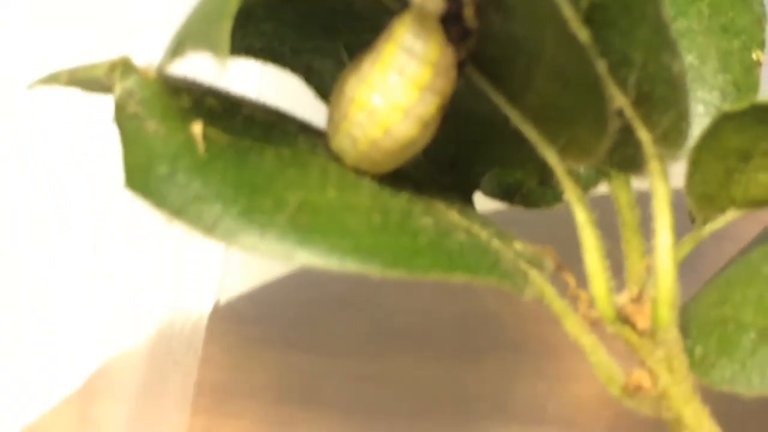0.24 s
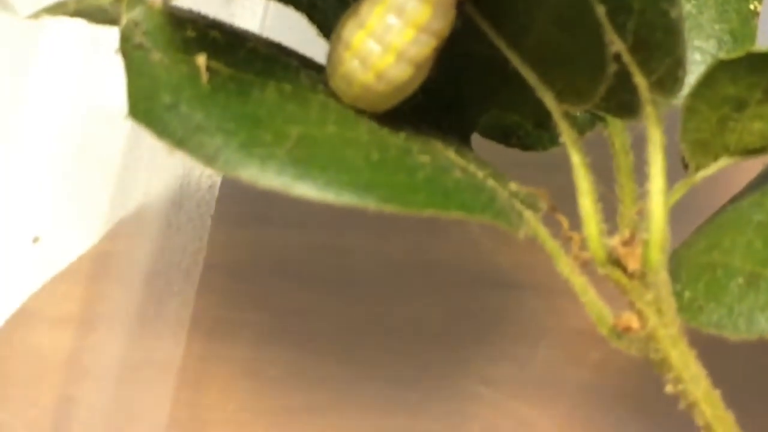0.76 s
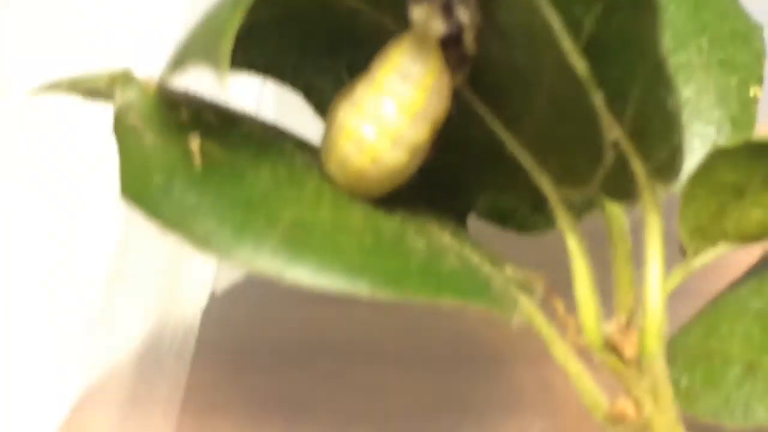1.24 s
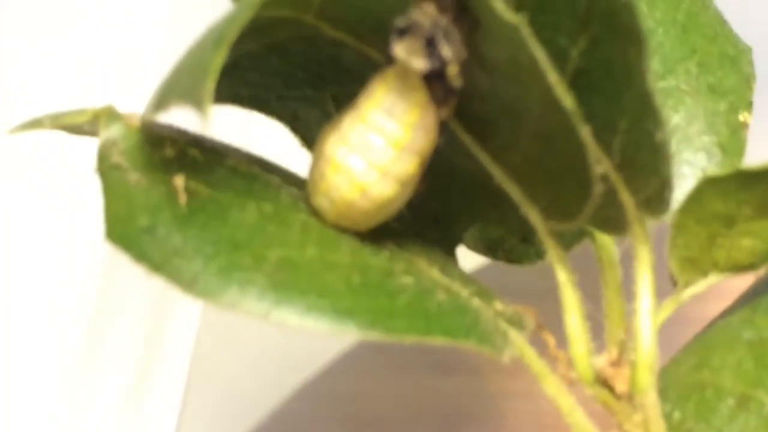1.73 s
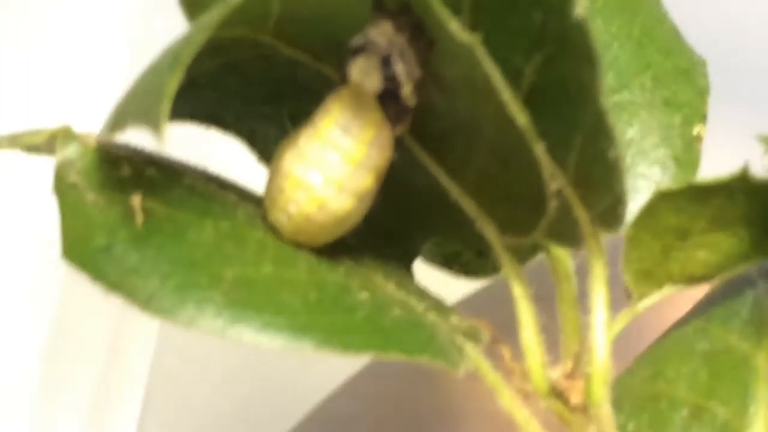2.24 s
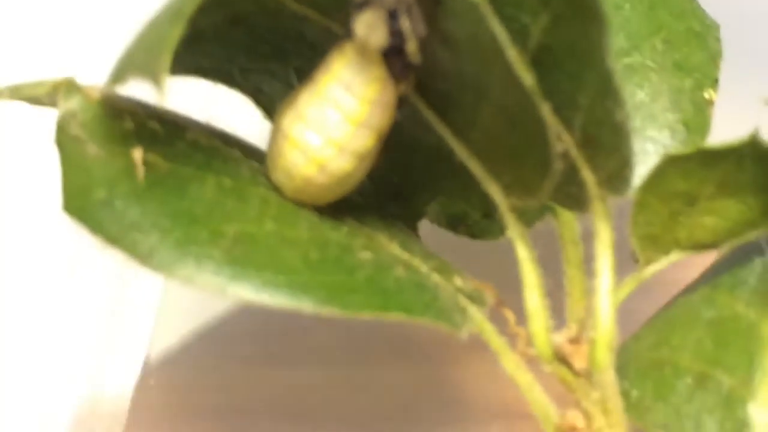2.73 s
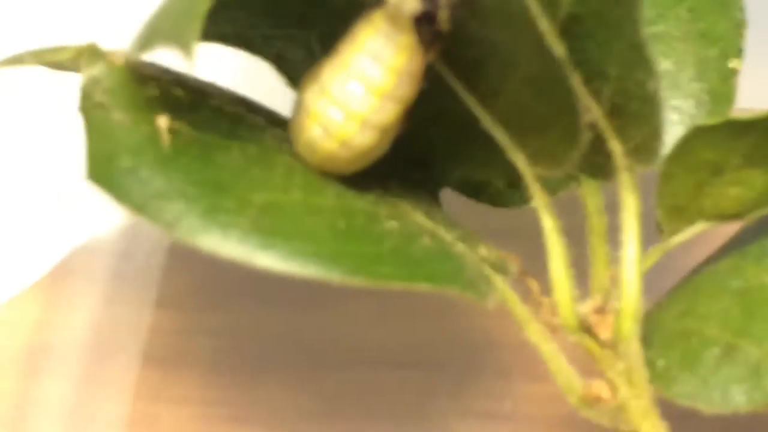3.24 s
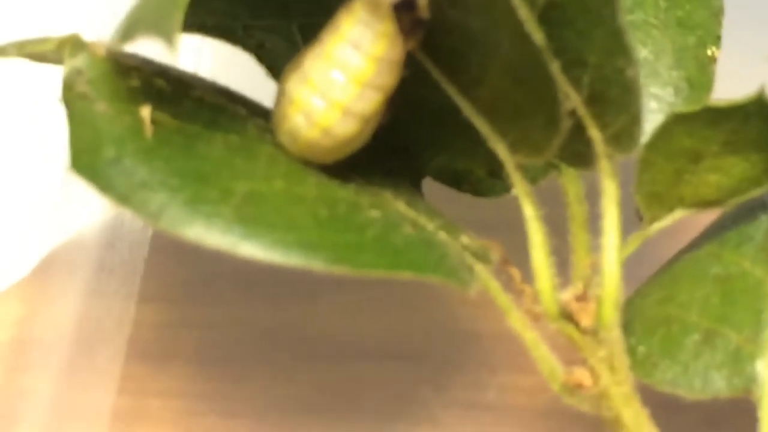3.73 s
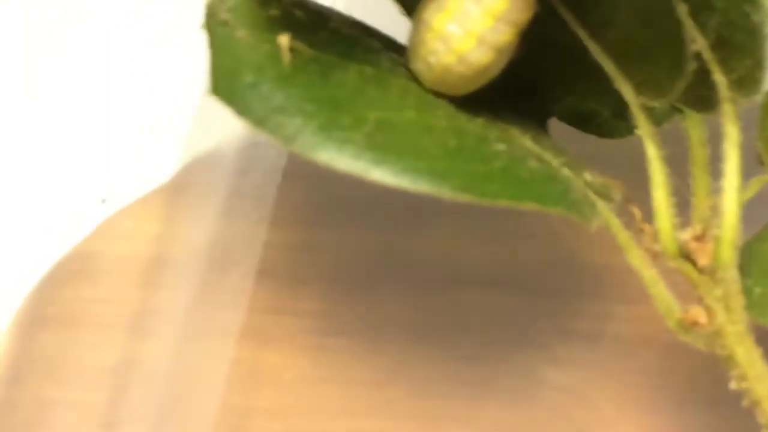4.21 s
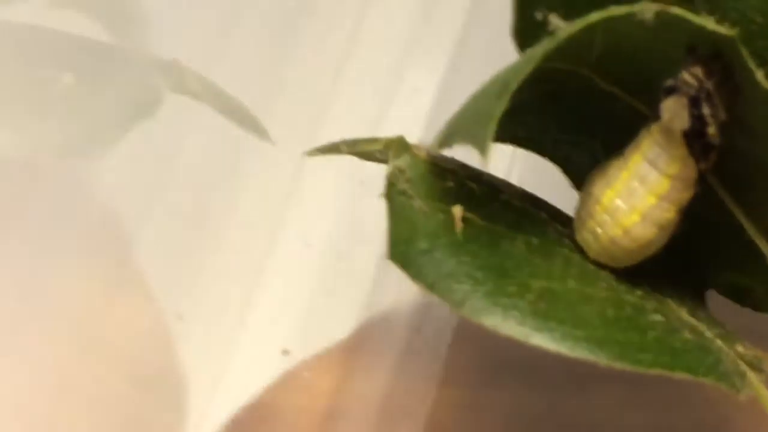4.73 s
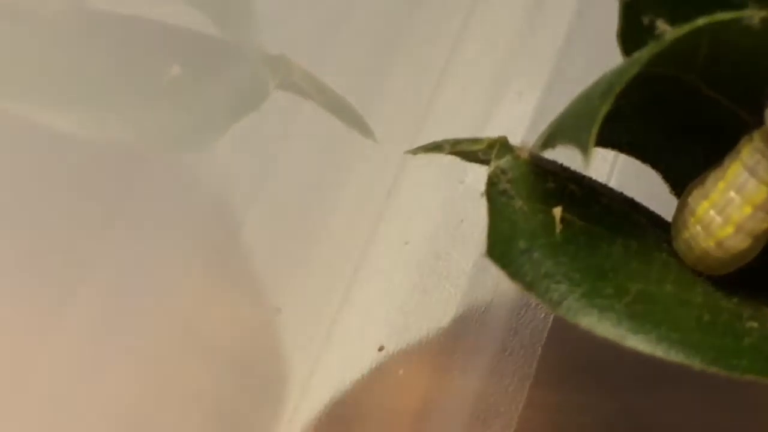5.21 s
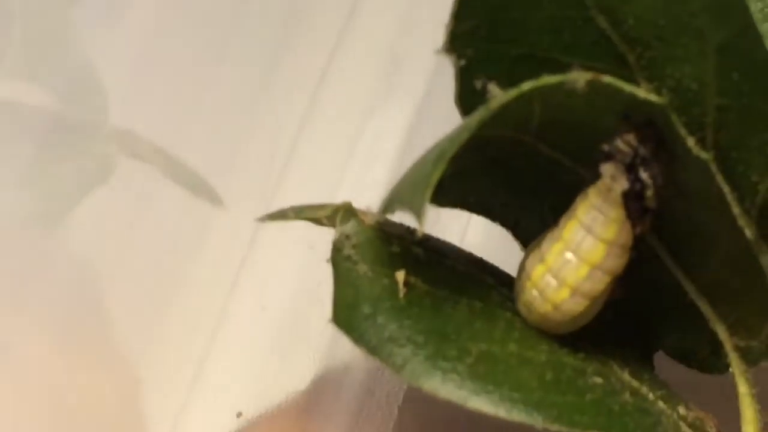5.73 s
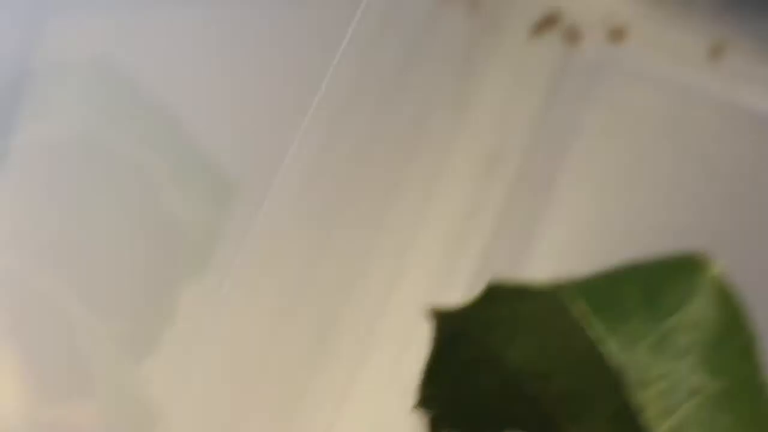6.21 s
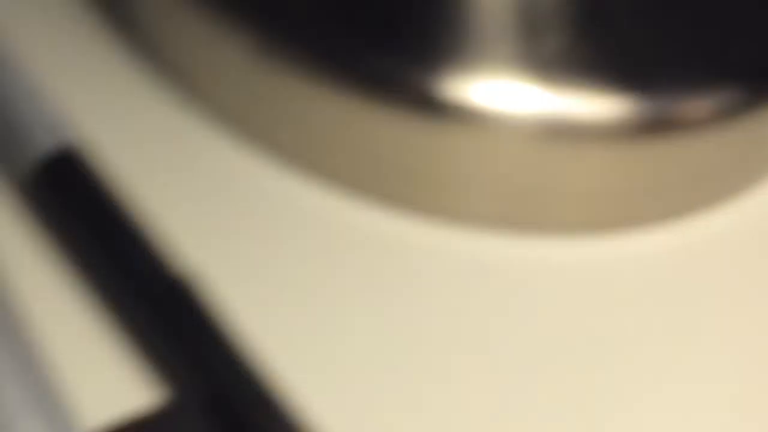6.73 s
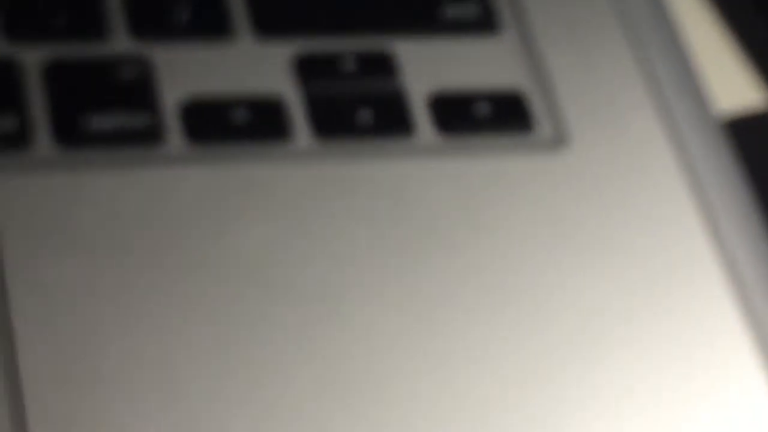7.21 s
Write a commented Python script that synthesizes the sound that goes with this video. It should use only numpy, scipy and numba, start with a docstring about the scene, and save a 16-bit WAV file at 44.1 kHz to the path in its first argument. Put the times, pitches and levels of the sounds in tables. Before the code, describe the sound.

Very close to a phone microphone in a quiet room, fingers rub the case with dull rumbling strokes and soft thuds. Heavier shuddering bumps come early, then one overwhelming cracking knock at about three seconds. Afterwards only faint scuffs remain, with a crisp knock near six seconds and a few tiny clicks at the end.

```python
"""Fingers shifting on a handheld phone

Close to the microphone, in a quiet room with a faintly buzzing lamp, skin rubs over the case in strokes,
shudders by stick-slip where it grips, and bumps it. Random friction and short pushes excite
the resonances of one small body; short bands of noise add scuffs, squeaks, cracks and airy hiss.
Light taps and ticks are damped modes, room air is shaped noise, the lamp a resonance on mains harmonics.
The phone's gain control ducks after the loudest blows."""
import sys
import numpy as np
from scipy import signal
from scipy.fft import rfft, irfft
from scipy.io import wavfile
from scipy.ndimage import uniform_filter1d
from numba import njit

SR = 44100
rng = np.random.default_rng(int(sys.argv[2]) if len(sys.argv) > 2 else 0)


def waveform_to_disk(signal):
    """Save audio, clipped to [-1, 1], as 16-bit WAV at the path in sys.argv[1]."""
    frames = np.transpose(np.atleast_2d(signal))
    scaled = np.clip(frames, -1, 1) * 32767
    samples = np.round(scaled).astype(np.int16)
    wavfile.write(sys.argv[1], SR, samples)


N = 328866
TIME = np.arange(N) / SR  # seconds

# Spectrum of still room air and microphone hiss, relative shape: frequency_hz, density_db
ROOM_SPECTRUM = [(18, -31.5), (30, -0.5), (97, -1.5), (524, -14.5), (1110, -14), (1870, -21.5), (3980, -25),
                 (4650, -25.5), (5300, -24.5), (15000, -32.5)]
# Lamp buzz over time: time_s, centre_hz, level_db
LAMP_DRIFT = [(0, 4650, -82.5), (2, 4574, -80), (4.4, 4520, -81), (4.7, 4300, -80.5), (5.9, 4193, -81),
              (6.25, 4310, -87), (6.44, 5060, -84.5), (6.55, 4470, -83.5), (6.8, 4460, -93)]
# Light taps of a hollow plastic thing: start_s, peak_db
TAPS = [(3.85, -39.5), (6.765, -49), (6.835, -43.5)]
# Modes of the tapped thing: frequency_hz, relative_level_db, t60_s
TAP_MODES = [(824, 8.5, 0.022), (971, 0, .012), (1323, 8, 0.017), (1787, -20, 0.0099), (3377, -18.5, .008)]
# Tiny hard ticks: start_s, peak_db
TICKS = [(7.089, -41), (7.346, -63.5)]
# Modes of the ticks: frequency_hz, relative_level_db, t60_s
TICK_MODES = [(5000, -2, 0.014), (5526, -5, 0.01), (5960, 1, 0.01), (9600, -5.5, 0.012)]
# Short bands of noise (scuffs, squeaks, the bright crack of a knock, airy hiss, a faint low bump):
# middle_s, length_s, centre_hz, width_hz, level_db
NOISE_BURSTS = [(0.23, 0.13, 2100, 110, -68), (2.981, 0.018, 11500, 7000, -44),
                (5.882, 0.004, 8800, 11000, -40.5), (5.368, 0.017, 3350, 2100, -52),
                (5.44, 0.028, 3500, 1300, -62.5), (6.114, 0.0078, 3370, 2030, -43.5),
                (6.109, 0.016, 8900, 9400, -57), (6.231, 0.0099, 614, 180, -42.5),
                (6.262, 0.0071, 550, 200, -41), (6.496, 0.033, 1780, 350, -64.5),
                (5.19, .05, 14000, 2500, -77), (7.299, 0.041, 277, 70.1, -67.5),
                (7.33, 0.02, 11600, 4600, -69.5)]
# Bumps on the case: start_s, knock_peak_db, knock_lowpass_hz, thud_peak_db, thud_lowpass_hz
BUMPS = [ (.335, -54, 400, -28.5, 150), (.371, -35, 1100, -37, 198), (.560, -37, 800, -30.5, 200),
         (0.672, -40, 910, -32.5, 200), (.740, -39, 900, -43, 200), (1.121, -38.5, 400, -41, 200),
         (1.182, -22.5, 700, -16, 200), (1.384, -35, 1200, -48, 200), (1.415, -28, 400, -27, 200),
         (1.853, -31, 400, -25.5, 250), (1.883, -24.5, 504, -34, 250), (1.909, -20, 503, -33, 250),
         (2.967, -2.5, 3000, 1, 85), (2.9736, -8.5, 2487, -3, 170), (2.98, -12.5, 4000, -15, 200),
         (2.9881, -16, 7984, -10.5, 170), (3.0203, -19, 700, -18, 250), (3.035, -26, 400, -16.5, 250),
         (3.644, -58.5, 406, -44.5, 100.5), (4.416, -47, 502, -45.5, 250), (5.267, -44, 700, -36, 80),
         (5.376, -30.5, 3000, -39, 200), (5.453, -54, 600, -32.5, 40), (5.512, -44, 696, -58, 200),
         (5.657, -38, 2500, -35.5, 30), (5.879, -15.5, 2460, -21.5, 30), (6.116, -41, 700, -28.5, 30),
         (6.513, -38, 250, -29, 100)]
# Broad slope of the case as the microphone hears it: frequency_hz, gain_db
CASE_SLOPE = [(25, -49), (45, -10.5), (80, 5.5), (170, 0.5), (300, -5.5), (600, -5), (950, -16.5),
              (1500, -21.5), (2700, -27.5), (3500, -30.5), (6000, -41), (9000, -49), (15000, -63.5)]
# Resonances of the case: frequency_hz, width_hz, lift_db
CASE_MODES = [(131.4, 74, 8.5), (207.2, 50, 8.5), (266.5, 30, 0), (341, 83, 7), (395.7, 110, -5.5),
              (506.7, 80, 7), (695.6, 110, 7), (810, 45, 2), (1210, 24, 3.5), (1300, 35, 4.5),
              (1428.5, 110, 15.5), (1661, 84, 6.5), (1872, 18, 5), (2091, 120, 8), (2200, 35, 6.5),
              (2397, 49, 7), (2626, 33, 8.5), (2815, 120, 9), (3560, 86, 4), (4199, 200, 2.5),
              (4630, 340, 5), (6125, 410, 7), (8600, 700, 0)]
# Stick-slip shudders of a gripping finger: full_grip_s, hold_s, slip_rate_hz, level_db
SHUDDERS = [(0.828, .022, 128, -24.5), (1.857, 0.12, 126.9, -15.5), (1.897, 0.03, 128, -10.5),
            (2.493, 0.037, 180, -37.5), (3.055, .02, 109.9, -27.5), (6.02, .008, 125, -38),
            (6.14, .03, 114.9, -44)]
# Finger strokes: full_contact_s, hold_s, release_s, rubbing_db, brightness_db (surface beside rubbing),
# rumble_db (pressed case), hiss_db (skin at the port)
STROKES = [ (0.136, 0.053, 0.021, -57, -10.5, -46, -80), (0.198, 0.13, 0.037, -63.5, 1.5, -55, -77),
           (0.382, 0.054, 0.032, -42, -9.5, -31, -80), (0.502, 0.23, 0.09, -52, -8, -38, -78.5),
           (0.81, 0.1, 0.033, -44, -10.5, -30.5, -78), (1.022, 0.054, 0.025, -55.5, -20, -44.5, -90),
           (1.144, .035, .02, -46.5, -17, -28.5, -84), (1.192, 0.023, 0.03, -28.5, -4.5, -26.5, -67),
           (1.328, .025, .02, -62, 6, -66, -71.5), (1.403, 0.016, 0.05, -39, -1.5, -32.5, -68),
           (1.598, 0.2, 0.045, -53, -5, -43.5, -85), (1.811, .08, .02, -43.5, -10, -33, -76.5),
           (1.923, 0.011, 0.01, -26, -8, -19.5, -78), (1.958, 0.018, 0.014, -36, -12, -28, -81),
           (2.284, 0.057, 0.041, -51, -4.5, -53.5, -77), (2.464, 0.094, 0.037, -41, -4.5, -40.5, -90),
           (2.594, 0.043, 0.072, -44.5, -4.5, -47, -77), (2.756, 0.047, 0.038, -36, -7, -41.5, -67),
           (2.896, 0.027, .02, -39, -11.5, -46, -76), (2.966, 0.025, 0.011, -19.5, -10.5, -25.5, -59),
           (3.01, 0.049, 0.01, -34, -15, -27, -73), (3.083, 0.022, 0.024, -59, 3.5, -56, -88),
           (3.187, 0.017, 0.01, -56, 0, -52.5, -98), (3.284, 0.047, 0.02, -59, 4, -47, -76),
           (3.482, 0.031, .015, -67.5, -4.5, -63, -85.5), (3.725, 0.042, 0.016, -65.5, 2.5, -72, -78.5),
           (3.976, 0.022, 0.018, -64.5, -4, -68, -86), (4.098, 0.062, 0.021, -68, -5.5, -58, -82),
           (4.16, 0.11, 0.019, -62, -3.5, -64.5, -82), (4.423, 0.032, 0.019, -51.5, -5.5, -51.5, -69.5),
           (4.476, 0.035, 0.028, -57, 5.5, -67, -63), (4.721, 0.008, 0.015, -57.5, -7.5, -51, -76.5),
           (4.796, 0.065, .02, -64, -11.5, -61.5, -88), (4.947, .05, 0.024, -60, -3, -67, -79.5),
           (5.01, 0.065, 0.071, -55, -4.5, -46, -71), (5.133, .045, 0.077, -57.5, -1.5, -60, -66.5),
           (5.307, .03, 0.017, -52.5, -5.5, -52, -73), (5.358, 0.027, 0.044, -45.5, -11.5, -50, -66),
           (5.43, .018, 0.017, -46.5, -4, -53, -77), (5.635, 0.028, 0.024, -81, -2, -53, -86.5),
           (6.022, 0.01, 0.018, -59, -4, -43.5, -82), (6.067, 0.063, .02, -58.5, -4.5, -62, -88),
           (6.126, 0.059, 0.013, -62.5, -5, -46.5, -86), (6.198, 0.048, 0.025, -53, 0.5, -62, -74),
           (6.506, 0.013, 0.032, -57, -10, -46.5, -86.5)]

ROOM_DB = -69  # rms
BUZZ_HZ = 120
TOP_HZ = 15300  # upper edge of the phone's band

# Friction: envelope times in seconds; levels of the resting hand in dB, held until it relaxes
ATTACK_S = .022
REST_RUB_DB, REST_BRIGHT_DB, REST_RUMBLE_DB, REST_HISS_DB = -69.5, -4, -63, -85.5
RELAX_S, RELAX_FADE_S, REST_WANDER_DB = 6.32, 0.075, 2.5
SHUDDER_ATTACK_S, SHUDDER_RELEASE_S = .016, .013

# Bumps: scrape and chatter levels are beside the push, times are exponential decays
SCRAPE_DB, SCRAPE_S, SCRAPE_HIGHPASS_HZ = 5.5, .005, 1599
SCRAPE_DB_PER_OCTAVE, HARD_HZ = 3, 997  # a brighter knock scrapes more; HARD_HZ is the reference
CHATTER_DB, CHATTER_S = -5, .004
KNOCK_HIGHPASS_HZ = 230
THUD_HIGHPASS_SHARE = .26  # of the thud's low-pass frequency


def undb(db):
    """Decibel law: amplitude gain from a level."""
    return 10 ** (np.asarray(db) / 20)


def unit(x):
    """Normalisation: scale a signal to rms 1."""
    return x / np.sqrt(np.mean(x ** 2))


def curves(table):
    """Linear interpolation: each column of a table joined by straight lines in time."""
    s, *columns = np.transpose(table)
    return [np.interp(TIME, s, column) for column in columns]


def band(x, hz, kind, order=2):
    """Butterworth filtering: a maximally flat passband."""
    corner_hz = np.clip(hz, 5, .45 * SR)
    return signal.sosfilt(signal.butter(order, corner_hz, kind, fs=SR, output="sos"), x)


def response(slope, modes=(), size=8192):
    """Minimum phase: the folded cepstrum of a slope with resonances yields a causal impulse response."""
    hz = np.maximum(np.arange(size // 2 + 1) * SR / size, 1)
    points, slope_db = np.transpose(slope)
    db = np.interp(np.log(hz), np.log(points), slope_db)
    for mode_hz, width_hz, lift_db in modes:
        db = db + lift_db / (1 + (2 * (hz - mode_hz) / width_hz) ** 2)
    cepstrum = irfft(np.log(undb(db)))
    cepstrum[1:size // 2] *= 2
    cepstrum[size // 2 + 1:] = 0
    return irfft(np.exp(rfft(cepstrum)))


def ring(force, impulse):
    """Linear superposition: convolve a force with the impulse response of a body."""
    return signal.fftconvolve(force, impulse)[:len(force)]


def add(out, s, sound, peak_db):
    """Superposition: mix in a sound at time s, scaled to the given peak level."""
    start = int(s * SR)
    scaled = sound * undb(peak_db) / np.abs(sound).max()
    out[start:start + len(sound)] += scaled[:N - start]


def waver(hz):
    """Low-passed noise: a slow random drift with rms 1, mostly below hz."""
    return unit(band(rng.standard_normal(N), hz, "low"))


def grains(spread_db, size=N):
    """Impulsive noise: countless tiny random grains, a few much larger than the rest."""
    noise = rng.standard_normal(size)
    grain_size_db = spread_db * np.minimum(rng.exponential(size=size), 6)
    return unit(noise * undb(grain_size_db))


def even(x, seconds):
    """Running rms normalisation: hold the strength of a random force steady over the given time."""
    power = uniform_filter1d(x ** 2, max(int(seconds * SR), 1))
    return x / np.sqrt(power + 1e-12)


def swell(s, hold, attack, release):
    """Exponential build-up and decay: rise to 1 at time s, hold, and die away."""
    rise = np.minimum((TIME - s) / attack, 0)
    fall = np.maximum(TIME - s - hold, 0) / release
    return np.exp(np.maximum(rise - fall, -30))


def room():
    """Stationary noise: still room air and the microphone's own hiss share one shaped spectrum."""
    return unit(ring(rng.standard_normal(N), response(ROOM_SPECTRUM))) * undb(ROOM_DB)


def lamp():
    """Resonance on a harmonic series: each mains half cycle pings a high resonance of drifting pitch."""
    centre_hz, level_db = curves(LAMP_DRIFT)
    buzz, width_hz = 0, 420
    for hz in BUZZ_HZ * np.arange(33, 44):  # only the harmonics around the resonance
        detune = 2 * (hz - centre_hz) / width_hz
        lag = np.arctan(detune)
        buzz = buzz + np.sin(2 * np.pi * hz * TIME - lag) / (1 + detune ** 2)
    return unit(buzz) * undb(level_db + waver(hz=6))


def strike(modes, tail_db, tail_s, size=4096):
    """Modal decay: damped modes struck once, with a faint scatter of reflections after them."""
    t = np.arange(size) / SR
    tone = np.zeros(size)
    for hz, db, t60 in modes:
        tone += undb(db) * np.sin(2 * np.pi * hz * t) * np.exp(-np.log(1000) * t / t60)
    # a small object radiates little far below its lowest mode
    tone = band(tone, modes[0][0] / 2, "high")
    reflections = rng.standard_normal(size) * np.exp(-t / tail_s)
    return tone + undb(tail_db) * ring(reflections, tone)


def clicks():
    """Impulsive excitation of modes: hollow taps and tiny hard ticks."""
    out = np.zeros(N)
    for s, peak_db in TAPS:
        add(out, s, strike(TAP_MODES, tail_db=-65, tail_s=.02), peak_db)
    for s, peak_db in TICKS:
        add(out, s, strike(TICK_MODES, tail_db=-41.5, tail_s=0.028), peak_db)
    return out


def noise_bursts(case):
    """Band-limited noise: case-coloured grains, narrowed to a band each, swell and fade briefly."""
    out = np.zeros(N)
    coloured = ring(grains(spread_db=5.0), case)
    for middle_s, length, hz, width, db in NOISE_BURSTS:
        edges_hz = np.array([hz - width / 2, hz + width / 2])
        burst = even(band(coloured, edges_hz, "band", order=3), 2 * length)
        out += burst * undb(db) * np.exp(-2 * ((TIME - middle_s) / length) ** 2)
    return out


def bumps(case, size=8192):
    """Contact stiffness: a hard, scraping contact gives a bright knock, the soft fingertip a dull thud."""
    out, t = np.zeros(N), np.arange(size) / SR
    for s, knock_db, knock_hz, thud_db, thud_hz in BUMPS:
        scrape = grains(spread_db=3.0, size=size) * np.exp(-t / SCRAPE_S)
        scrape = band(scrape, SCRAPE_HIGHPASS_HZ, "high", order=1)
        scrape_db = SCRAPE_DB + SCRAPE_DB_PER_OCTAVE * np.log2(knock_hz / HARD_HZ)
        # the loosely held phone chatters on for a moment after the push
        chatter = rng.standard_normal(size) * np.exp(-t / CHATTER_S)
        push = signal.unit_impulse(size) + undb(CHATTER_DB) * chatter / np.linalg.norm(chatter)
        knock = push + undb(scrape_db) * scrape / np.linalg.norm(scrape)
        knock = band(band(knock, knock_hz, "low", order=1), KNOCK_HIGHPASS_HZ, "high", order=1)
        thud = band(push, thud_hz, "low", order=1)
        thud = band(thud, THUD_HIGHPASS_SHARE * thud_hz, "high", order=1)
        add(out, s, ring(knock, case), knock_db)
        add(out, s, ring(thud, case), thud_db)
    return out


def pressure():
    """Power addition: resting hand and strokes set the gains of flesh, surface, rumble and hiss."""
    rest = swell(0, RELAX_S, ATTACK_S, RELAX_FADE_S) * undb(REST_WANDER_DB * waver(hz=8.2))
    contacts = [(rest, REST_RUB_DB, REST_BRIGHT_DB, REST_RUMBLE_DB, REST_HISS_DB)]
    for s, hold, release, *levels in STROKES:
        contacts.append((swell(s, hold, ATTACK_S, release), *levels))
    power = np.zeros((4, N))
    for shape, rub, bright, rumble, hiss in contacts:
        gains = undb([rub, rub + bright, rumble, hiss])
        power += np.outer(gains ** 2, shape ** 2)
    return np.sqrt(power)


def grip():
    """Power weighting: shudder strengths add as powers, and the strongest grip dominates the slip rate."""
    power = np.array([(undb(db) * swell(s, hold, SHUDDER_ATTACK_S, SHUDDER_RELEASE_S)) ** 2
                      for s, hold, _, db in SHUDDERS])
    rates_hz = np.array([hz for _, _, hz, _ in SHUDDERS])
    total = power.sum(axis=0)
    return np.sqrt(total), rates_hz @ power / total


def slips(hz, jitter):
    """Phase accumulation: the stick-slip cycle, with its rate wandering a little."""
    return 2 * np.pi * np.cumsum(hz * (1 + jitter * waver(hz=48.4))) / SR


def rubbing(case):
    """Sliding friction: pressure rocks the case, ridges scratch it, and the port picks up a dry hiss."""
    flesh_gain, surface_gain, rumble_gain, hiss_gain = pressure()
    shudder_gain, slip_hz = grip()
    shudder_share = shudder_gain ** 2 / (shudder_gain ** 2 + rumble_gain ** 2)
    phase = slips(slip_hz, jitter=.08)
    # a firm grip adds a nearly regular shudder to the loose rumble
    rumble = band(ring(grains(spread_db=2.5), case), 260, "low", order=4)
    rumble = band(even(rumble, seconds=.04), 55, "high", order=4)
    shudder = unit(np.sin(phase) + undb(-28.5) * np.sin(2 * phase))
    # the ridges scratch hardest in one half of each cycle, and the finger drags unevenly
    slip_modulation = 1 + 0.52 * shudder_share * np.sin(phase)
    scratch = ring(grains(spread_db=2.0) * slip_modulation, case)
    drag = undb(1.8 * waver(hz=43.0))
    # the flesh of the finger sounds the low resonances, its dry surface the high ones
    flesh = unit(band(band(scratch, 290, "high", order=4), 1200, "low", order=4))
    surface = unit(band(scratch, 793, "high", order=4))
    port = response([(1000, -25.0), (3000, 1.0), (5000, 3.5), (9000, -1.5), (15000, -7.5)])  # Hz, dB
    hiss = unit(ring(grains(spread_db=2.5), port))
    rubbed = drag * (flesh * flesh_gain + surface * surface_gain)
    return rumble * rumble_gain + shudder * shudder_gain + rubbed + hiss * hiss_gain


def scene():
    """Superposition: all sources summed at the one microphone."""
    case = response(CASE_SLOPE, CASE_MODES)
    return (room() + lamp() + clicks() + noise_bursts(case) + bumps(case) + rubbing(case))[None]


@njit
def follow(x, attack, release):
    """Asymmetric smoothing: a level follower that rises fast and sinks slowly."""
    out, level = np.empty(len(x)), 0.
    for i in range(len(x)):
        level += (abs(x[i]) - level) * (attack if abs(x[i]) > level else release)
        out[i] = level
    return out


def gain_control(x, knee_db, slope, attack_s, release_s):
    """Compression: turn the gain down while the followed level is over the knee."""
    level = follow(x, 1 / (attack_s * SR), 1 / (release_s * SR))
    return x * np.maximum(level / undb(knee_db), 1) ** -slope


def record(dry):
    """Nonlinear and band limits: the phone ducks after loud blows, clips at full scale and cuts the top."""
    ducked = gain_control(dry[0], knee_db=-20, slope=0.13, attack_s=.012, release_s=0.39)
    held = np.clip(ducked, -1, 1)
    return signal.sosfilt(signal.ellip(10, .2, 80, TOP_HZ, fs=SR, output="sos"), held)[None]


dry = scene()
out = record(dry)
waveform_to_disk(out)
```